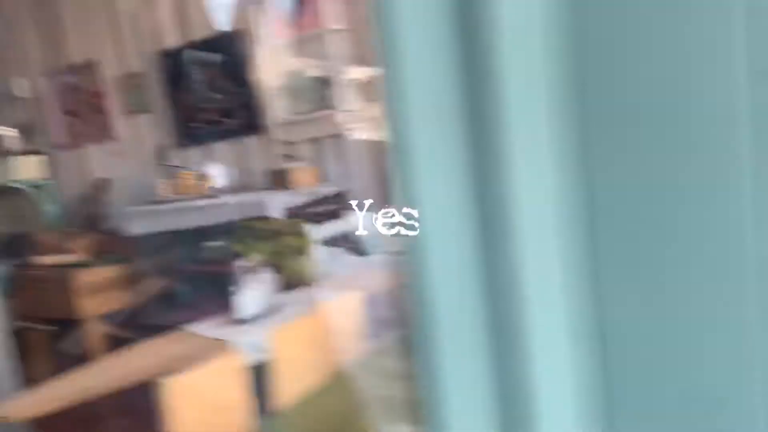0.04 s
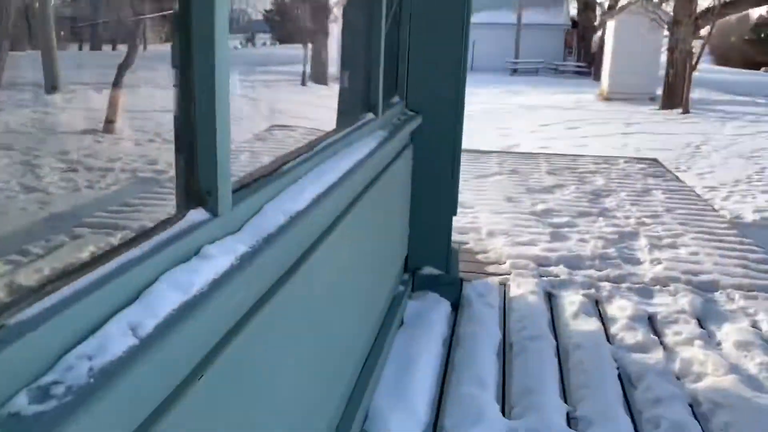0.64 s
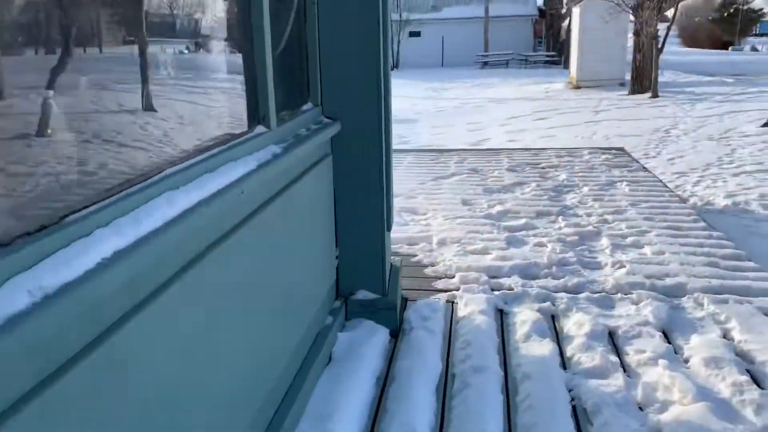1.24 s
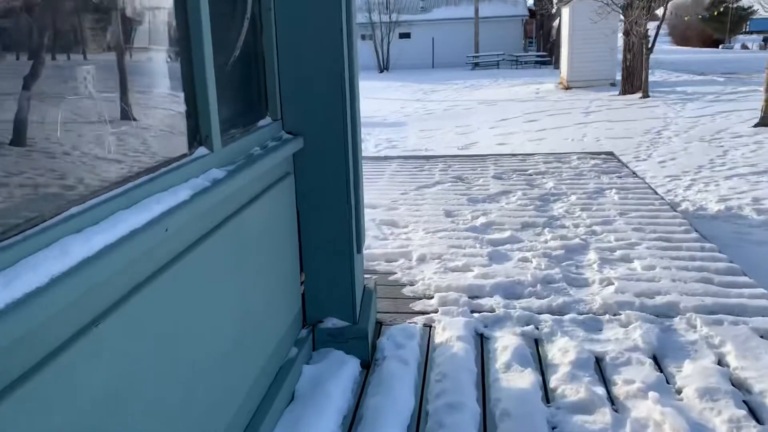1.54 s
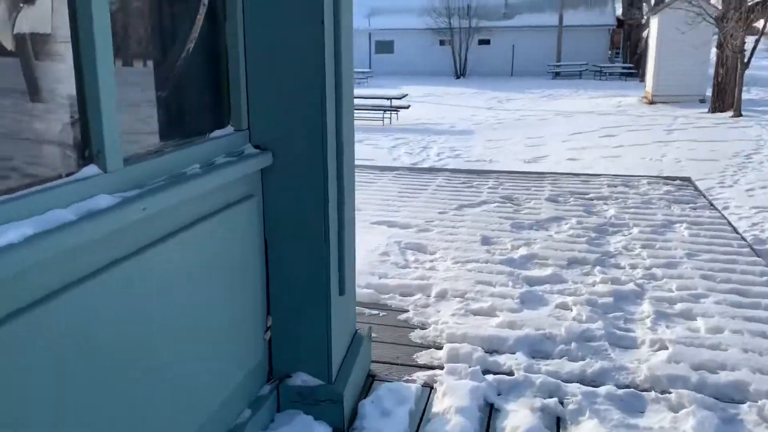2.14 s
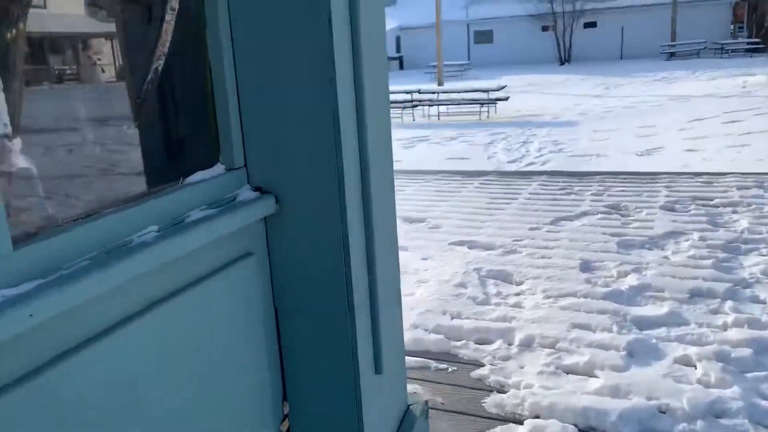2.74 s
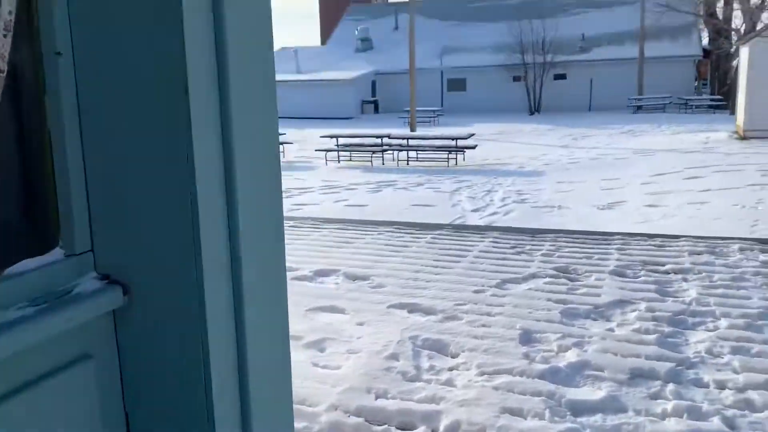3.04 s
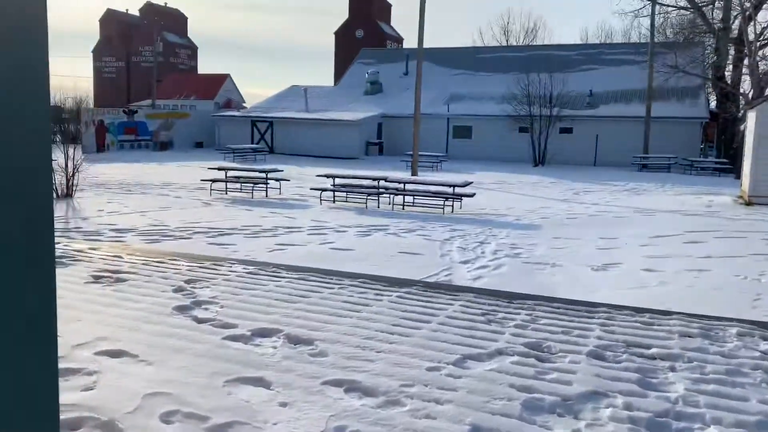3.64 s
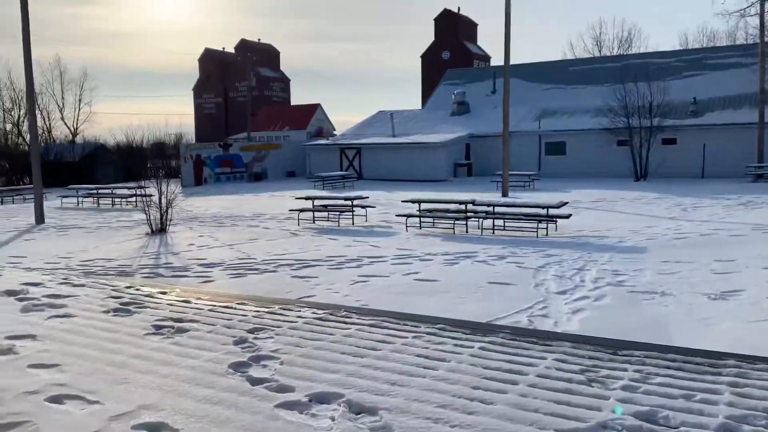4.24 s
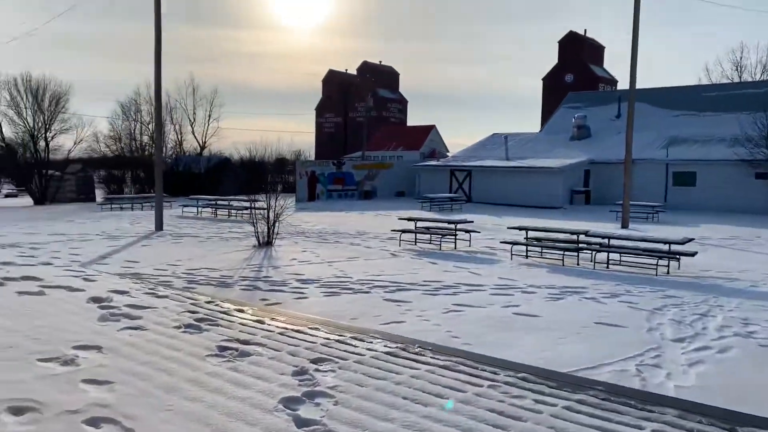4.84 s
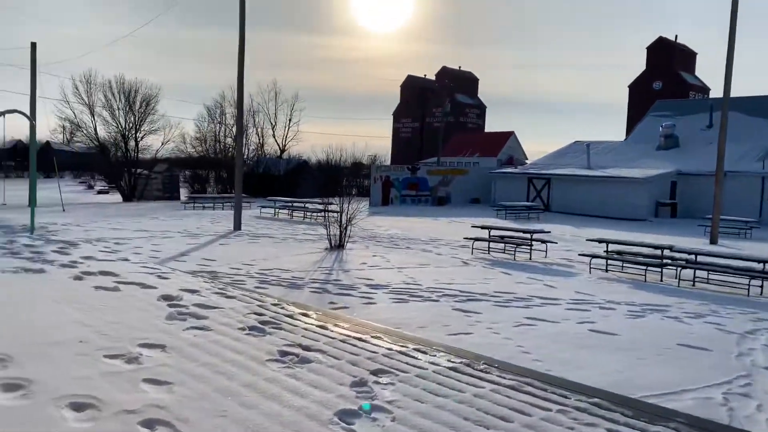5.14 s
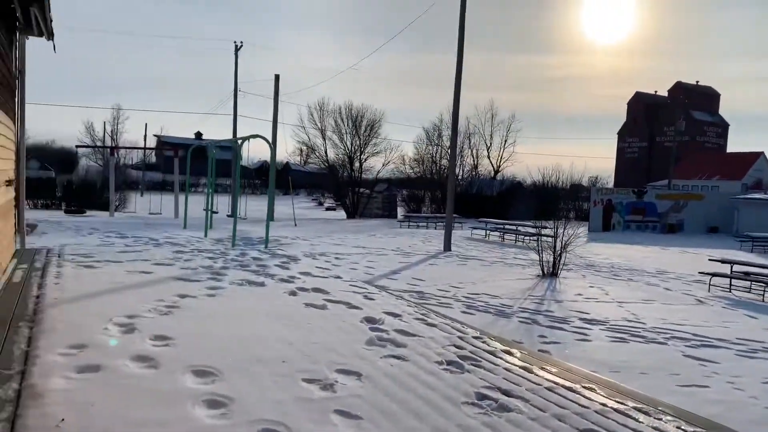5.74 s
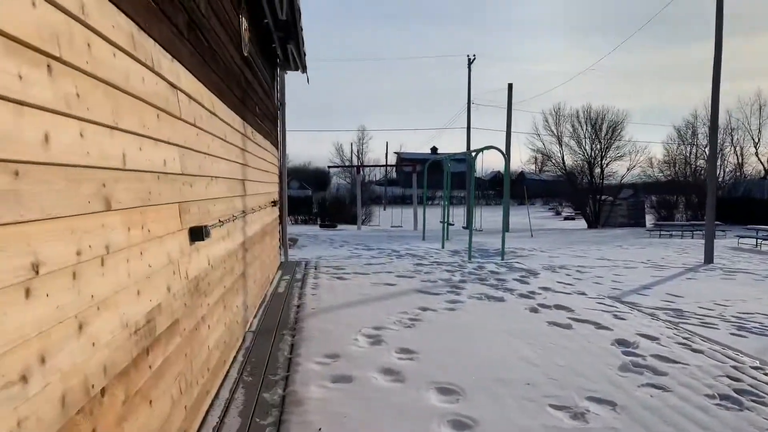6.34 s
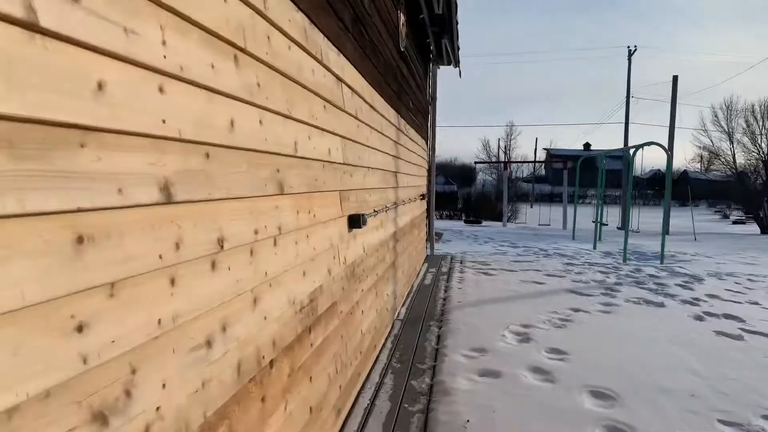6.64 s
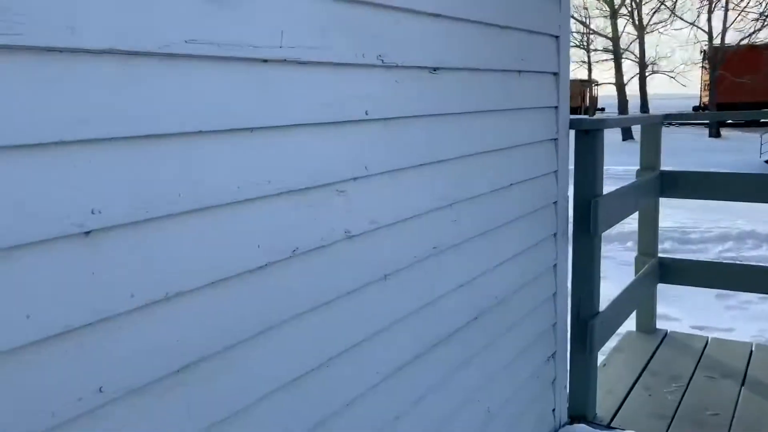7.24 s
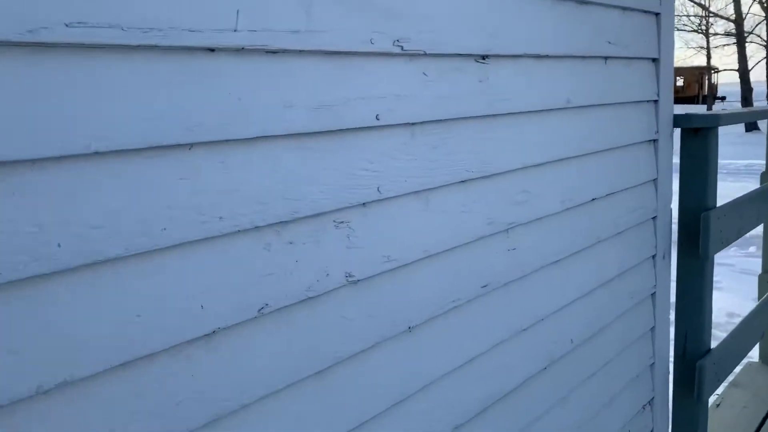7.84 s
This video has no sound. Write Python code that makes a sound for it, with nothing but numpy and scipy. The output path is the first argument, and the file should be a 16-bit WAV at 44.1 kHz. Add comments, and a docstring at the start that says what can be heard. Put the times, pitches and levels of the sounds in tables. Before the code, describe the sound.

Slow, uneven footsteps cross cold, packed snow on a wooden deck, heard close from a microphone in the walker's hand. From the start, a step falls a little more often than once a second, each a grainy crunch with creaks, hollow groans and small sharp cracks, over a dull thud and rumble from the boards. A winter jacket swishes with the strides and gives an occasional tick. Low wind rumbles lightly on the microphone, swelling at the start, around 2 seconds and again near 4 and 6 seconds, over a faint outdoor hush. The sharpest crack of crust comes at about 5 seconds, and the snow is squeakiest around 6.5 seconds. At 7 seconds a tiny metallic click is followed by a split-second dropout. One last, lighter step with a soft scuff comes around 7.4 seconds and fades before 8.

```python
"""Slow footsteps on cold, packed snow over a wooden deck, heard from a phone in the walker's hand.
Below the microphone each boot loads the snow and rolls off: the snow sticks, slips, groans and
collapses in tiny fractures and sharp cracks, and the boards thud. Close by a winter jacket swishes;
low wind rumbles on the microphone and a wooden wall returns a quick reflection.
The sound drops out briefly before one last, lighter step."""
import sys
import numpy as np
from scipy import signal
from scipy.fft import rfft, irfft, next_fast_len
from scipy.io import wavfile
from scipy.ndimage import uniform_filter1d

SR = 44100
rng = np.random.default_rng(int(sys.argv[2]) if len(sys.argv) > 2 else 0)


def file_out(sig):
    """Save sig as 16-bit WAV at sys.argv[1]."""
    # one column per channel
    cols = np.atleast_2d(sig).T
    # limit, then scale
    lim = np.clip(cols, -1, 1)
    pcm = np.round(lim * 32767).astype(np.int16)
    wavfile.write(sys.argv[1], SR, pcm)


N = 348213
TIME = np.arange(N) / SR

# boots pressing the snow, full steps and light shifts of weight: t/s, loading/s, rolling off/s,
# then relative level/dB of crunch, deep groan, jacket and deck rumble
STEPS = [(0.005, 0.25, 0.067, -37.5, -31, -46, -36), (0.454, 0.0091, 0.061, -48, -40, -68, -37),
         (0.818, 0.31, 0.055, -37.5, -35, -53, -30), (1.648, 0.21, 0.06, -40.5, -35, -47.5, -32.5),
         (1.92, 0.13, 0.017, -47.5, -43, -60, -35.5), (2.312, 0.0074, 0.11, -38.5, -38.5, -41.5, -33),
         (2.449, .11, 0.063, -36, -34, -44, -29), (2.922, 0.0045, 0.028, -42, -35.5, -73, -36),
         (3.02, 0.049, 0.099, -37.5, -34, -49.5, -37.5), (3.159, 0.043, 0.054, -44, -46.5, -52, -32.5),
         (3.422, 0.014, 0.016, -51.5, -46.5, -66, -58), (3.595, 0.073, 0.26, -48, -43.5, -54, -36),
         (3.706, 0.043, 0.14, -39.5, -34, -47.5, -34.5), (3.959, 0.04, 0.027, -46, -50, -61, -45),
         (4.356, 0.17, 0.092, -36.5, -37, -51, -32.5), (4.867, 0.24, 0.048, -46.5, -46, -57.5, -42),
         (5.151, 0.13, 0.15, -35.5, -33, -47, -34.5), (5.783, 0.0064, 0.25, -43.5, -46.5, -56.5, -55),
         (6.21, 0.09, 0.04, -38.5, -42, -59.5, -44), (6.4, 0.1, 0.06, -36.5, -38, -60.5, -41.5),
         (6.58, 0.11, 0.083, -44, -41, -52, -35.5), (7.316, 0.098, 0.041, -53.5, -48.5, -51.5, -47.5),
         (7.449, 0.061, 0.087, -42, -39.5, -49.5, -45)]
CRUNCH_COLUMN, GROAN_COLUMN, JACKET_COLUMN, DECK_COLUMN = 3, 4, 5, 6
# how firmly the snow grips the sole along the way: t/s, squeak above crunch/dB
GRIP = [(3.8, 3), (4.5, 6.5), (5.4, 3), (6.5, 13), (6.7, -4)]
# wind on the microphone: t/s, level/dB
WIND_LEVEL = [(0, -40.5), (1.5, -50.5), (2.2, -36), (3.5, -57), (4.2, -43.5), (4.8, -54), (5.65, -49),
              (5.88, -42), (6.7, -49.5), (7.1, -52), (7.9, -59.5)]
# faint rustle of the jacket between steps: t/s, relative level/dB
RUSTLE_LEVEL = [(0.38, -58), (0.9, -46.5), (1.5, -54), (2.2, -53.5), (2.85, -44), (3.2, -52.5), (3.35, -58),
                (4.1, -56.5), (4.75, -64), (5.6, -60), (6.9, -93), (7.8, -62)]
# hollow groans under full weight, the first row a hum of the deck: middle t/s, level/dB, f/Hz, length/s
GROANS = [(0.12, -30.5, 184, 0.19), (0.228, -28, 327, 0.07), (1.113, -31, 470, 0.06),
          (1.857, -29.5, 401, 0.1), (2.559, -30.5, 498, 0.1), (3.049, -32.5, 826, 0.064),
          (3.105, -34, 430, 0.085), (3.782, -30, 350, 0.097), (4.441, -34, 897, 0.094)]
# the sharpest cracks of the crust: t/s, level/dB, f/Hz, crumbling time/s
CRACKS = [(0.183, -24.5, 740, 0.0063), (0.219, -25, 800, 0.009), (0.273, -22.5, 704, 0.009),
          (0.744, -34, 950, 0.018), (0.87, -26, 680, 0.011), (0.938, -32.5, 770, 0.009),
          (1.178, -26.5, 830, 0.0079), (1.251, -36.5, 890, 0.017), (1.637, -37.5, 860, 0.017),
          (1.854, -36, 736, 0.06), (1.937, -30.5, 740, 0.0054), (1.986, -34, 875, 0.0048),
          (2.026, -29.5, 780, 0.017), (2.134, -39, 940, 0.0078), (2.185, -39, 960, 0.0059),
          (2.236, -32.5, 865, 0.0052), (2.318, -29, 780, 0.0056), (2.619, -27.5, 840, 0.0039),
          (2.86, -36.5, 710, 0.0057), (2.923, -33.5, 740, 0.01), (3.268, -25.5, 840, 0.0053),
          (3.593, -34.5, 1140, 0.0058), (3.674, -33, 960, 0.003), (3.889, -30.5, 740, 0.0051),
          (4.164, -32.5, 734, 0.0098), (4.217, -32.5, 845, 0.011), (4.286, -32, 1000, 0.0076),
          (4.509, -23.5, 890, 0.014), (4.547, -28.5, 900, 0.014), (4.598, -28, 970, 0.004),
          (4.672, -35.5, 990, 0.0035), (4.97, -32.5, 980, 0.0036), (5.0494, -16.5, 1060, 0.003),
          (5.095, -27.5, 800, 0.0057), (5.189, -25, 1020, 0.0037), (5.363, -30, 840, 0.0088),
          (5.402, -32.5, 820, 0.0097), (5.445, -28.5, 770, 0.0019), (5.474, -32.5, 820, 0.011),
          (5.821, -34.5, 970, 0.0094), (5.995, -33.5, 760, 0.01), (6.061, -37, 890, 0.01),
          (6.102, -38, 1020, 0.0055), (6.169, -36.5, 816, 0.0073), (6.378, -33.5, 870, 0.0014),
          (6.402, -34.5, 970, .002), (6.669, -33.5, 910, 0.0078), (6.709, -25.5, 930, 0.0015),
          (6.718, -29, 714, 0.0025), (6.753, -30.5, 760, 0.0027), (7.088, -46, 1810, 0.0074),
          (7.144, -46, 1370, 0.0037), (7.228, -39, 1900, 0.0031), (7.277, -44, 1810, 0.005),
          (7.304, -32.5, 1290, 0.0047)]
# the walker's weight landing on the boards: t/s, relative peak level/dB, favoured f/Hz
THUDS = [(0.187, -15, 188), (0.297, -27, 67.3), (1.191, -25, 188), (1.254, -24, 71), (2.037, -21.5, 72.62),
         (2.627, -25, 75.4), (3.093, -23.5, 94), (3.283, -23.5, 114), (3.601, -26.5, 116),
         (3.832, -19.5, 92), (4.224, -24, 109), (4.301, -23.5, 69.5), (5.054, -24.5, 121), (6.744, -25, 63),
         (6.851, -24, 57.4), (7.47, -33, 190)]
# small hard ticks of clothing and ice: t/s, relative peak level/dB
TICKS = [(0.274, -33), (1.074, -24.5), (2.315, -35), (3.269, -45), (4.922, -35.5), (5.362, -31),
         (5.401, -41), (6.525, -39.5), (6.969, -45), (7.307, -31.5), (7.3733, -41)]
# single clean slips of firm snow that ring like wood: t/s, level/dB
CREAKS = [(0.437, -35.5), (0.45, -39), (0.485, -38), (0.529, -34), (3.2, -38), (3.223, -35), (3.248, -35),
          (3.548, -46), (4.258, -35.5), (4.341, -50), (4.353, -42), (4.609, -29.5), (4.833, -43),
          (4.873, -43.5), (4.897, -39.5), (5.0306, -25), (5.152, -30.5), (5.743, -38), (6.03, -34.5),
          (7.687, -48)]
# light scuffs of soles and sleeves: t/s, level/dB, f/Hz, length/s
SCUFFS = [(0.562, -49.5, 1010, 0.27), (1.131, -44, 7200, 0.049), (2.647, -47, 5700, 0.3),
          (3.43, -49, 1600, 0.054), (7.33, -47.5, 2180, 0.4)]

# ringing modes: f/Hz, t60/s, relative level/dB
DECK_MODES = [(57.1, 0.37, -4), (68.6, 0.29, -5.5), (91.9, 0.25, -0.5), (117, 0.23, 2), (160, 0.11, -1.5),
              (194, 0.067, 13.5), (284, 0.056, 17.5)]  # wooden boards
CREAK_MODES = [(880, .008, -1), (1240, .008, 0), (2150, .004, -5)]  # firm snow
CLICK_MODES = [(3040, .011, -13), (5330, 0.011, 2), (9040, 0.0033, 1)]  # a small metallic click

# spectral densities: f/Hz, relative level/dB
GUST_SPECTRUM = [(20, -28.5), (35, -11.5), (55, 3), (80, 0), (115, -8.5), (180, -13), (300, -13.5)]  # wind on the microphone
AIR_SPECTRUM = [(60, -6), (200, 6.5), (500, -2), (1000, -2.5), (2000, -12), (5000, -16.5), (15000, -27)]  # hush of the open yard
CRUNCH_SPECTRUM = [(400, -19), (650, -6.5), (950, -10.5), (1400, -13), (2100, -6), (3000, -22), (5000, -25),
                   (12000, -31.5)]  # grains breaking in the top layer
GRIT_SPECTRUM = [(1800, 23), (2600, 17.5), (5500, 2.5), (13000, -8.5)]  # grit thrown off by a slip
GROAN_SPECTRUM = [(100, -24.5), (180, 1), (300, 2), (500, -0.5), (650, -6.5), (950, -16.5)]  # deeper snow packing
RUMBLE_SPECTRUM = [(35, -16.5), (55, -1), (80, 2.5), (115, -1.5), (180, -7.5), (300, -15)]  # boards under load
CLOTH_SPECTRUM = [(1200, 15), (2200, 13.5), (3300, 0), (4800, 8), (6700, -5.5), (8500, 5), (13500, -5),
                  (16000, 0)]  # stiff cloth rubbing
EDGE_SPECTRUM = [(2000, 11), (3800, 10.5), (5500, -3.5), (8500, 6.5), (15000, -19)]  # icy edge of a crack
TICK_SPECTRUM = [(2000, 21), (3600, 14), (5300, 8.5), (8000, 10), (15000, 2)]  # hard tick of clothing or ice

# left microphone port above the right: f/Hz, level/dB
PORT_BALANCE = [(100, -2), (2000, 0.5), (4000, 4), (8000, -3.5), (13000, 0.5)]


def undb(db):
    """Decibels to gain."""
    return 10 ** (np.asarray(db) / 20)


def unit(x):
    """Scale to an rms of one."""
    return x / np.sqrt(np.mean(x ** 2) + 1e-20)


def curve(table):
    """Gain over time from points of t/s, level/dB."""
    return undb(np.interp(TIME, *np.transpose(table)))


def add(out, s, sound):
    """Mix a sound in at a time."""
    i = max(int(s * SR), 0)
    out[:, i:i + sound.shape[-1]] += sound[..., :N - i]


def at_level(sound, db):
    """Scale a short sound so that its loudest four milliseconds have this level."""
    power = uniform_filter1d(np.mean(sound ** 2, axis=0), size=176)
    return sound * undb(db) / np.sqrt(power.max())


def flutter(rate, t=TIME):
    """Smooth random wavering with a spread near one."""
    knots = rng.standard_normal(4096)
    return np.interp(t * rate, np.arange(len(knots)), knots)


def ring(x, hz, q):
    """A resonance with gain one at its centre."""
    return signal.lfilter(*signal.iirpeak(hz, q, fs=SR), x + 1e-18)


def linger(x, decay_s):
    """Give each impulse an exponential tail."""
    return signal.lfilter([1], [1, -np.exp(-1 / (decay_s * SR))], x)


def ports(mid, side, hz, apart_hz=2100):
    """The microphone's two ports: alike in the bass, ever less alike in the treble."""
    spread = (hz / (hz + apart_hz)) ** .5
    return np.array([mid + spread * side, mid - spread * side]) / np.sqrt(1 + spread ** 2)


def from_below(x, lag_samples=13):
    """Sound from under the phone reaches the right port before the left."""
    return np.array([np.roll(x[0], lag_samples), x[1]])


def colour(drive, spectrum, width=1, wander_db=0):
    """Each impulse rings third-octave bands with random strengths: every grain has its own tone."""
    f, db = np.transpose(spectrum)
    out, at = 0, np.flatnonzero(drive)
    for hz in 20 * 2 ** (np.arange(30) / 3):
        if f[0] / 1.1 < hz < f[-1] * 1.1:
            size = drive[at] * undb(wander_db * flutter(22, TIME[at]))  # the favoured tones shift
            mid, side = rng.standard_normal((len(at), 2)).T * size
            kicks = np.zeros((2, len(drive)))
            kicks[:, at] = ports(mid, width * side, hz)
            band = signal.butter(2, [hz / 1.13, hz * 1.13], "band", fs=SR, output="sos")
            gain = undb(np.interp(np.log(hz), np.log(f), db))
            out = out + gain * signal.sosfilt(band, kicks + 1e-18)
    return unit(out)


def effort(column, attack_s, swell_db, ease_db, release_s, lag_s=0):
    """Gain of one layer over all steps: the boot lands, takes full weight, rolls off and lets go."""
    power = np.zeros(N)
    for step in STEPS:
        start, load_s, roll_s = step[:3]
        times = start + lag_s + np.cumsum([0, attack_s, load_s, roll_s, release_s]) - attack_s
        during = slice(*np.searchsorted(TIME, times[[0, -1]]))
        shape_db = np.interp(TIME[during], times, [-40, swell_db, 0, ease_db, -40])
        power[during] += undb(step[column] + shape_db) ** 2
    return np.sqrt(power)


def fractures(rate, scatter_db, clump_db, clump_rate):
    """Random impulses of uneven size that come in avalanches."""
    hit = rng.random(N) < rate / SR
    sizes = hit * undb(scatter_db * rng.standard_normal(N) + clump_db * flutter(clump_rate))
    # the steady weight of the body sets how much snow breaks in any short while
    return sizes / np.sqrt(np.abs(uniform_filter1d(sizes ** 2, size=1300)) + 1e-6)


def stick_slip(slip_rate=135, scatter_db=5, evenness=2):
    """Cold snow holds and lets go under the sole in a train of slips, ragged when evenness is low."""
    gaps = rng.gamma(evenness, 1 / (evenness * slip_rate), size=4000)
    at = (np.cumsum(gaps) * SR).astype(int)
    at = at[at < N]
    slips = np.zeros(N)
    slips[at] = undb(scatter_db * rng.uniform(-1, 1, len(at)))
    return slips


def knock(push, hz, q=1):
    """A slip under the boot: a few cycles of one resonance, its overtones muffled by sole and snow."""
    sole = signal.butter(4, 1.167 * hz, fs=SR, output="sos")
    return signal.sosfilt(sole, ring(push, hz, q))


def pings(events, modes, detune):
    """Single short blows each ring a few modes, randomly mistuned by the fraction detune."""
    out, t = np.zeros((2, N)), TIME[:2048]
    for s, db in events:
        sound = 0
        for hz, t60, mode_db in modes:
            shift, lean = rng.standard_normal(2)
            mode = undb(mode_db - 60 * t / t60) * np.sin(2 * np.pi * hz * (1 + detune * shift) * t)
            sound = sound + ports(mode, mode * lean / 2, hz)
        add(out, s, at_level(sound, db))
    return out


def wind():
    """Low gusts rumble right on the microphone."""
    return colour(np.ones(N), GUST_SPECTRUM, wander_db=5.5) * curve(WIND_LEVEL)


def yard_air(level_db=-59):
    """The faint, steady hush of the open yard."""
    return undb(level_db) * colour(np.ones(N), AIR_SPECTRUM)


def crumbs(gain_db=-14, icy_db=-10, hz=1050):
    """As the weight shifts before each step, firm crust gives in ticks that go on under the boot."""
    breaks = fractures(rate=70, scatter_db=3, clump_db=2, clump_rate=9) * undb(4 * flutter(25))
    knocks = unit(knock(ports(breaks, breaks * rng.standard_normal(N), hz), hz))
    ticks = knocks + undb(icy_db) * from_below(colour(breaks, GRIT_SPECTRUM))
    weight = effort(CRUNCH_COLUMN, attack_s=0.85, swell_db=-9.5, ease_db=-13, release_s=0.048)
    return undb(gain_db) * ticks * np.sqrt(curve(GRIP)) * weight


def squeak(low_hz=860, high_hz=1100, q=3.9, width=1.64):
    """Firm snow ratchets in fairly even slips, each a knock shared at random by two resonances."""
    slips = stick_slip(scatter_db=3.5, evenness=6)
    share, side = rng.random(N), rng.uniform(-1, 1, N)
    out = 0
    for hz, push in ((low_hz, share * slips), (high_hz, (1 - share) * slips)):
        stereo_push = ports(push, width * push * side, hz)
        out = out + knock(ring(stereo_push, hz, 1), hz, q)
    return unit(out)


def top_snow(top_db=1, creak_db=-5, grit_db=-19, burst_s=0.01, creak_hz=620):
    """Slips under the sole creak, throw off grit and set off bursts of crunching grains."""
    slips, grip = stick_slip(), curve(GRIP)
    bursts = 1 + linger(slips, burst_s)  # steady creep, plus a surge at each slip
    grains = fractures(rate=800, scatter_db=4, clump_db=3, clump_rate=70) * bursts
    creak = unit(knock(ports(slips, slips * rng.standard_normal(N), creak_hz), creak_hz))
    loose = colour(grains, CRUNCH_SPECTRUM, wander_db=2.5) + undb(creak_db) * creak
    # firm snow spends the work of the boot on squeaking, loose snow on crunching and a lower creak
    top = (loose + grip * squeak()) / np.sqrt(1 + grip ** 2)
    grit = from_below(colour(slips, GRIT_SPECTRUM))
    crushing = effort(CRUNCH_COLUMN, attack_s=0.06, swell_db=-6.5, ease_db=-10, release_s=0.086)
    return (undb(top_db) * top + undb(grit_db) * grit) * crushing


def deep_snow(gain_db=1):
    """The packed snow further down groans in duller fractures."""
    grains = fractures(rate=700, scatter_db=4, clump_db=6, clump_rate=91)
    packing = effort(GROAN_COLUMN, attack_s=0.053, swell_db=-5, ease_db=-4, release_s=0.12)
    return undb(gain_db) * colour(grains, GROAN_SPECTRUM, wander_db=2) * packing


def deck_rumble(gain_db=-1):
    """The boards under the snow rumble while they carry a step."""
    load = effort(DECK_COLUMN, attack_s=0.028, swell_db=-7, ease_db=-2.5, release_s=0.34, lag_s=0.0051)
    return undb(gain_db) * colour(np.ones(N), RUMBLE_SPECTRUM, wander_db=2.5) * load


def jacket(swish_db=4, rustle_above_hz=2500):
    """Stiff cloth near the microphone rubs in a fizz of tiny catches, thinner between strides."""
    catches = fractures(rate=4000, scatter_db=3, clump_db=3.5, clump_rate=110)
    cloth = colour(catches, CLOTH_SPECTRUM, width=0.5, wander_db=3)
    rustle = signal.sosfilt(signal.butter(2, rustle_above_hz, "high", fs=SR, output="sos"), cloth)
    stride = effort(JACKET_COLUMN, attack_s=0.037, swell_db=-1.5, ease_db=-7, release_s=0.047)
    return from_below(cloth * stride * undb(swish_db) + rustle * curve(RUSTLE_LEVEL))


def groans(slip_rate=300, ring_s=0.0061, sag_per_s=0.68, upper_db=-3, upper_ratio=2.05, muffle_hz=1000):
    """Under full weight, crowded slips ring a hollow pair of resonances that sinks as the snow packs."""
    out = np.zeros((2, N))
    sole = signal.butter(4, muffle_hz, fs=SR, output="sos")
    for s, db, hz, length_s in GROANS:
        swell = signal.windows.hann(int(length_s * SR))
        t = TIME[:len(swell)] - length_s / 2
        slips = stick_slip(slip_rate)[:len(t)]
        push = ports(slips, slips * rng.standard_normal(len(t)) / 2, hz)
        cycles = np.cumsum(hz * np.exp(-sag_per_s * t)) / SR
        groan = 0
        for ratio, gain in ((1, 1), (upper_ratio, undb(upper_db))):
            phasor = np.exp(2j * np.pi * ratio * cycles)
            ringing = (phasor * linger(push / phasor, ring_s)).real  # a resonance that glides
            groan = groan + gain * unit(ringing)
        add(out, s - length_s / 2, unit(signal.sosfilt(sole, groan)) * swell * undb(db))
    return out


def cracks(lead_s=0.003, slip_rate=1900, crumb_db=-5, snap_db=-3, body_hz=330):
    """The crust slips, gives with one snap and crumbles: a knock with a hollow body and an icy edge."""
    out, t = np.zeros((2, N)), TIME[:4096] - lead_s
    for s, db, hz, crumble_s in CRACKS:
        strain = np.exp(np.minimum(2 * t / lead_s, -t / crumble_s))
        slips = (rng.random(len(t)) < slip_rate / SR) * strain * undb(crumb_db)
        mid, side = rng.uniform(-1, 1, (2, len(t))) * slips
        snap = np.argmax(strain)
        mid[snap], side[snap] = undb(snap_db) * np.array([1, rng.uniform(-1, 1)])
        push = ports(mid, side, hz)
        upper_hz = hz * rng.uniform(1.7, 2.4)
        upper = ring(ring(push, upper_hz, q=3), upper_hz, q=3)
        crust = unit(knock(push, hz, q=2.1) + undb(-12) * upper)
        body = undb(-12) * unit(knock(push, body_hz, q=4))
        edge = undb(-14) * from_below(colour(slips, EDGE_SPECTRUM))
        add(out, s - lead_s, at_level(crust + body + edge, db))
    return out


def board_thuds(gain_db=-1, rise_s=0.0038, log_spread=0.39, detune=0.041):
    """Each landing rings the deck; the place of the foot favours the modes near one pitch."""
    out, t = np.zeros((2, N)), TIME[:12000]
    for s, db, favoured_hz in THUDS:
        thud = 0
        for mode_hz, t60, mode_db in DECK_MODES:
            share = np.exp(-np.abs(np.log(mode_hz / favoured_hz)) / log_spread)
            hz = mode_hz * (1 + detune * rng.standard_normal())
            thud = thud + share * undb(mode_db - 60 * t / t60) * np.sin(2 * np.pi * hz * t)
        thud = thud * (1 - np.exp(-t / rise_s))
        add(out, s, thud / np.abs(thud).max() * undb(db + gain_db))
    return out


def hard_ticks(t60_s=0.012):
    """Clothing and ice tick now and then, each a bright burst that dies at once."""
    out = np.zeros((2, N))
    for s, db in TICKS:
        tick = colour(undb(-60 * TIME[:1024] / t60_s), TICK_SPECTRUM, width=0.5)
        add(out, s, tick / np.abs(tick).max() * 2 * undb(db))
    return from_below(out)


def creaks():
    """Single clean slips of firm snow ring like wood, a little differently each time."""
    return pings(CREAKS, CREAK_MODES, detune=0.08)


def scuffs():
    """Soles and sleeves give brief soft rubs that swell and fade."""
    out = np.zeros((2, N))
    for s, db, hz, length_s in SCUFFS:
        swell = signal.windows.hann(int(length_s * SR))
        rub = ring(ring(rng.standard_normal((2, SR)), hz, q=1), hz, q=1)
        add(out, s, unit(rub)[:, :len(swell)] * swell * undb(db))
    return out


def metal_click(at_s=6.968, level_db=-44):
    """One small metallic click rings just before the dropout."""
    return pings([(at_s, level_db)], CLICK_MODES, detune=0)


def wall(x, echo_s=0.006, sway=0.25, echo_db=-11):
    """The nearby wooden wall adds one quick reflection, whose delay shifts as the walker moves."""
    late = TIME - echo_s * np.exp(sway * flutter(2))
    return x + undb(echo_db) * np.array([np.interp(late, TIME, channel) for channel in x])


def scene():
    """Snow and deck lie ahead of and below the microphone, in light wind; the jacket is close by."""
    snow = wall(top_snow() + deep_snow() + groans() + cracks() + creaks() + crumbs())
    outdoors = snow + board_thuds() + deck_rumble() + wind() + yard_air()
    close = wall(jacket() + hard_ticks() + scuffs()) + metal_click()
    return from_below(outdoors, lag_samples=3) + close


def suppress_noise(x, quiet_db=-66, above_hz=450):
    """The phone's noise suppressor turns the treble down whenever little of it is left."""
    bass = signal.sosfiltfilt(signal.butter(2, above_hz, fs=SR, output="sos"), x)
    treble = x - bass
    power = np.abs(uniform_filter1d(np.mean(treble ** 2, axis=0), size=900))
    return bass + treble * power / (power + undb(quiet_db) ** 2)


def record(dry):
    """The handheld phone: hushed pauses, a colour for each port, the top cut off; the sound also falls silent
    for a moment."""
    dropout_from_s, dropout_to_s, top_hz = 6.991, 7.058, 15900
    size = next_fast_len(N)
    hz, db = np.transpose(PORT_BALANCE)
    lean_db = np.interp(np.log1p(np.fft.rfftfreq(size, 1 / SR)), np.log(hz), db)
    port_gains = undb(np.array([lean_db, -lean_db]) / 2)
    heard = irfft(rfft(suppress_noise(dry), size) * port_gains, size)[:, :N]
    live = (TIME < dropout_from_s) | (TIME > dropout_to_s)
    gate = np.maximum(uniform_filter1d(live.astype(float), size=64), 0.002)
    top_cut = signal.ellip(10, 0.2, 80, top_hz, fs=SR, output="sos")
    return signal.sosfilt(top_cut, heard * gate)


dry = scene()
out = record(dry)
file_out(out)
```